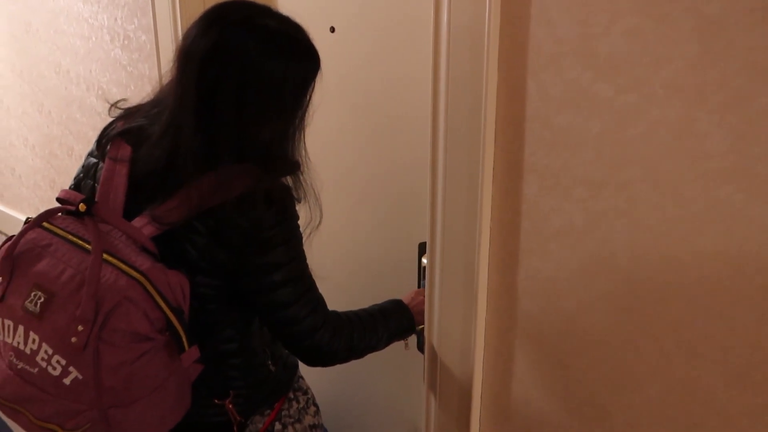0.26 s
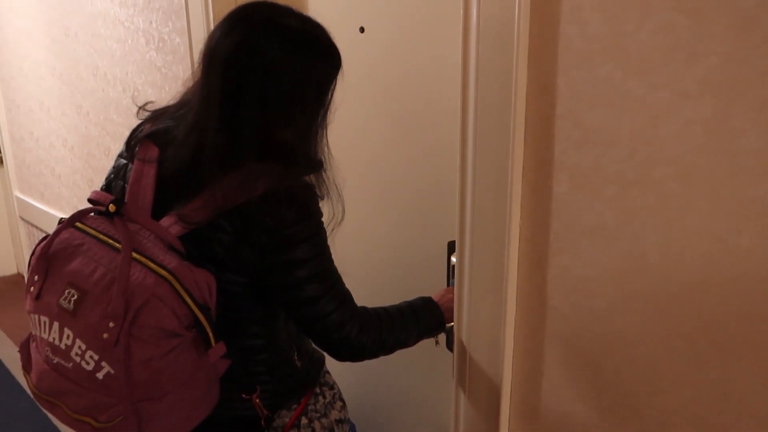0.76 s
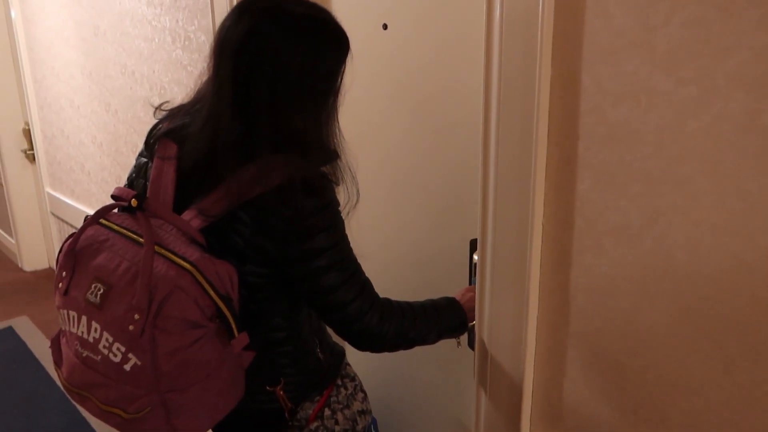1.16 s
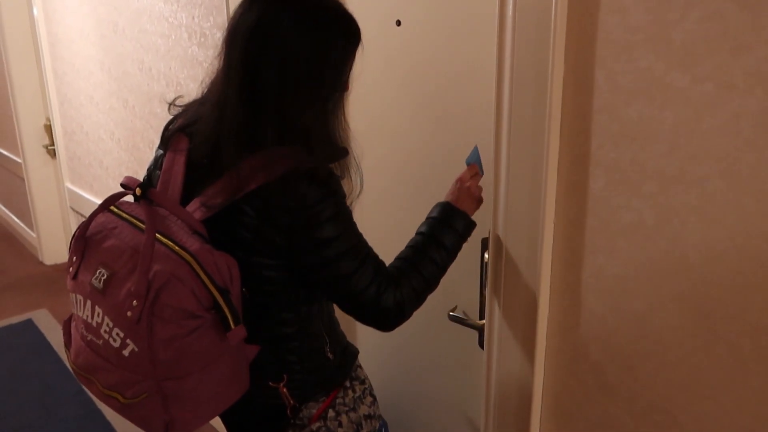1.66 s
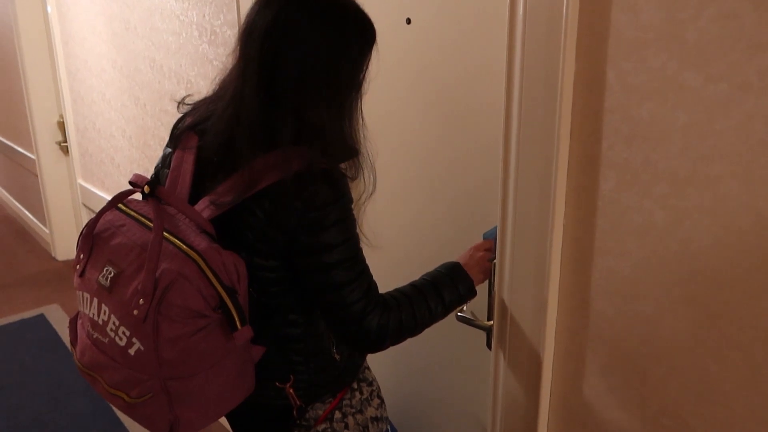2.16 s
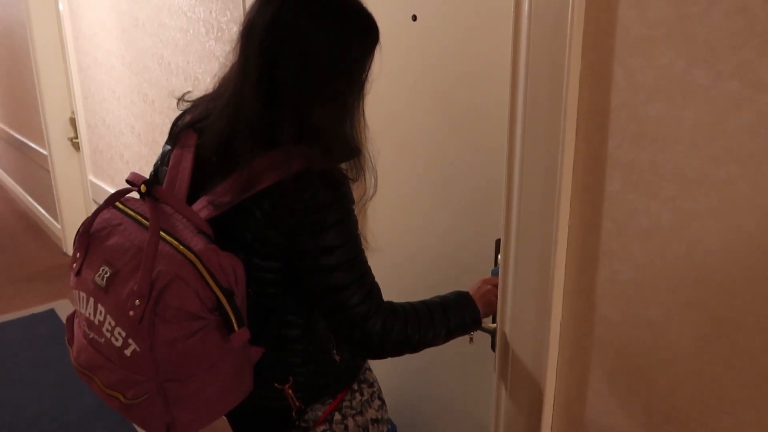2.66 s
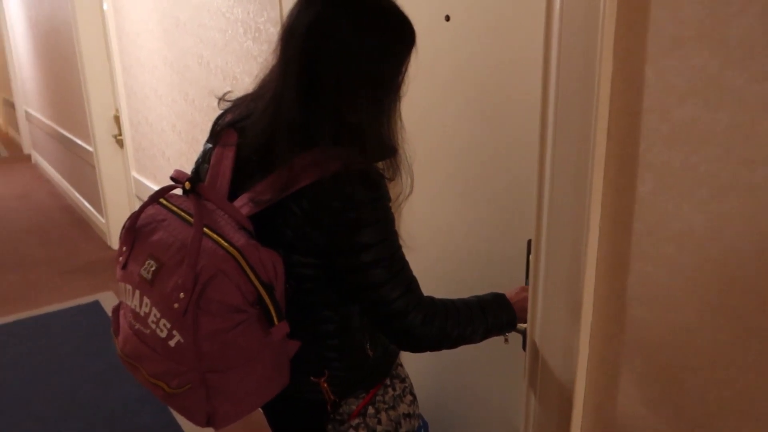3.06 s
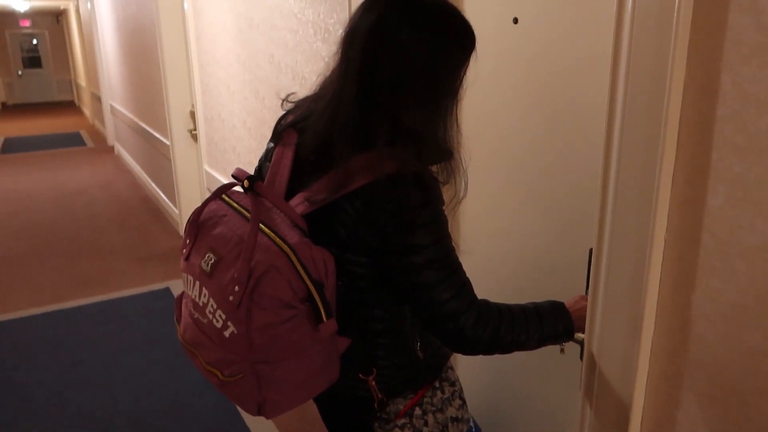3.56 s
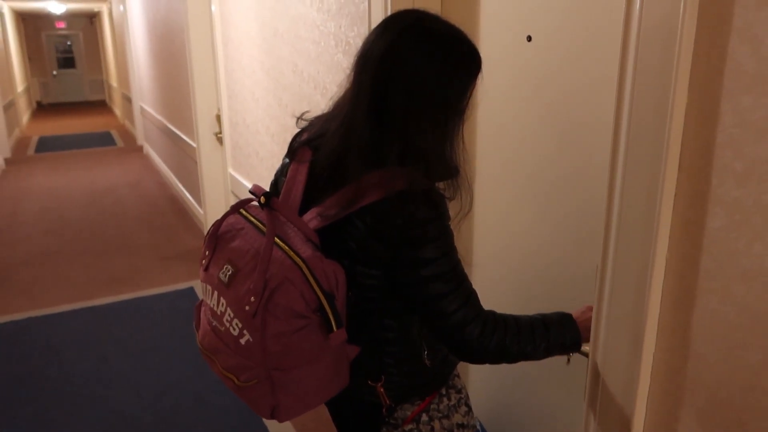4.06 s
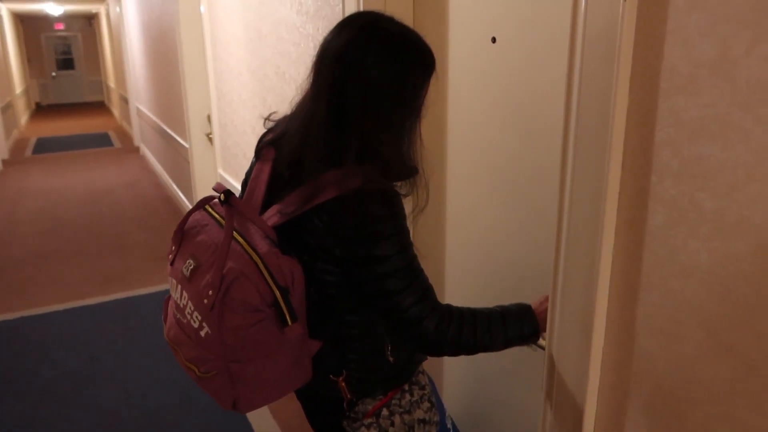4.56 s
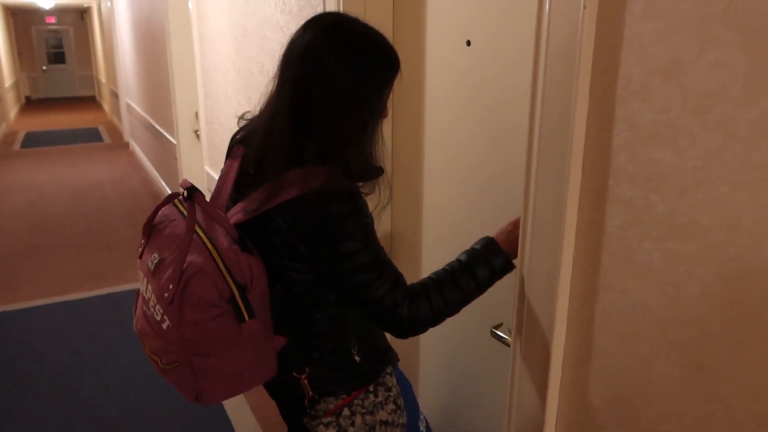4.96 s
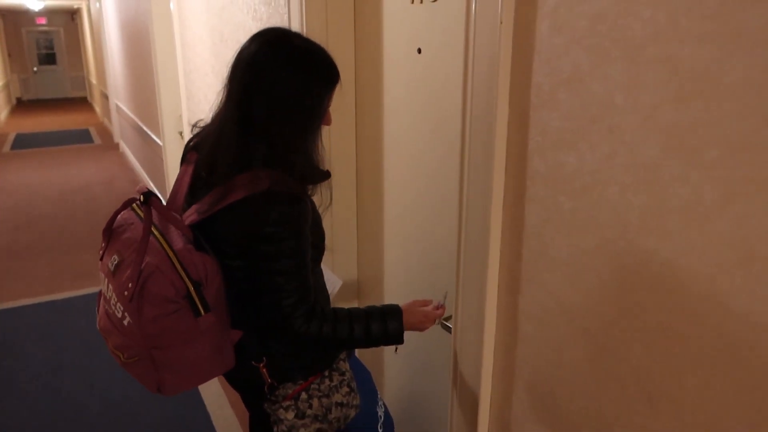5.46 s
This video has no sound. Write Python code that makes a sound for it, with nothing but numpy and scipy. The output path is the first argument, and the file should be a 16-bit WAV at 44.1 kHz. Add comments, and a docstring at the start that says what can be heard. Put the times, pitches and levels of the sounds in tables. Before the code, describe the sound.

Someone works a stubborn door handle in a hallway. Light metallic ticks lead to a single heavy clunk at about one and a half seconds, then a lull, small knocks and repeated latch snaps with loose rattling and low door thuds. Short diffuse echo, soft air hiss, microphone rumble and a very faint whine.

```python
"""Over steady corridor air, rumble and a faint recorder whine, a sleeve rubs and a lever is tried from the start.
Someone works the lock of a wooden door that stays shut in a long carpeted corridor: the lever springs back once
with a loud clunk that shakes the leaf, then the latch clicks and rattles again and again.
Metal contacts are noise flurries through body colours, leaf and small rings are dying sines, and rubs and air
are coloured noise; lock, door and rubs also go through the corridor's diffuse echo."""
import sys
import numpy as np
from scipy import signal
from scipy.fft import rfft, irfft
from scipy.io import wavfile
from scipy.ndimage import uniform_filter1d

SR = 44100
rng = np.random.default_rng(int(sys.argv[2]) if len(sys.argv) > 2 else 0)


def store_pcm(level_fs):
    """Save levels as 16-bit WAV."""
    pcm = np.round(np.clip(level_fs, -1, 1) * 32767).astype(np.int16)
    wavfile.write(sys.argv[1], SR, np.atleast_2d(pcm).T)


N = 251634  # samples
TIME = np.arange(N) / SR  # s
HIT_SIZE = 8192  # samples in one contact sound
HIT_TIME = TIME[:HIT_SIZE]
HIT_HZ = np.fft.rfftfreq(HIT_SIZE, 1 / SR)

# Corridor air. Each row: frequency in Hz, relative level in dB.
AIR_COLOUR = [(35, -47), (60, 1.5), (274, -6), (408, -7), (527, -5.5), (682, -12), (1470, -16), (1780, -17),
              (3270, -23), (3940, -20.5), (4220, -22), (8120, -24.5), (16000, -26)]
AIR_DB = -52  # rms
# Rumble on the microphone. Each row: frequency in Hz, relative level in dB.
RUMBLE_COLOUR = [(5, -1), (14, -1.5), (25, -7), (45, -10.5), (90, -27.5), (200, -35.5), (600, -59.5)]
# The microphone rumbles more once it is carried along.
STILL_DB, MOVING_DB, MOVE_START_S, MOVE_RAMP_S = -52, -42, 1.0, 2.0186
# Steady whine of the hand-held recorder. Each row: frequency in Hz, rms level in dB.
WHINE_TONES = [(3000, -75), (4000, -68.5), (5000, -74), (7000, -77.5), (8000, -73.5), (9000, -79),
               (10000, -89.5), (12000, -79.5)]

# Decay of the corridor. Each row: frequency in Hz, time to fall by 60 dB in seconds.
ECHO_T60 = [(70, 1.3542), (300, 0.9511), (1400, 0.6483), (3000, 1.0268), (8000, 0.7894), (15000, 0.0069)]
# Strength of its echoes. Each row: frequency in Hz, level in dB.
ECHO_LEVEL = [(70, -11.5), (300, -0.5), (1400, -7.5), (3000, -10.5), (8000, -12), (15000, -13.5)]

# Sleeve and fingers rubbing. Each row: centre in seconds, half length (to 1/e) in seconds, level in dB,
# tilt in dB per octave above 2 kHz.
SLEEVE_RUBS = [(0.04, 0.2646, -51, -11.5), (0.417, 0.05792, -52.5, -1), (0.965, 0.018, -42.5, -2),
               (2.099, 0.2516, -53, -16), (3.8, 0.1405, -52.5, -7.5), (5.252, 0.03246, -48.5, -8),
               (5.62, 0.3269, -51.5, -10.5)]
# Colour of the friction. Each row: frequency in Hz, relative level in dB.
FRICTION_COLOUR = [(300, -13.5), (1200, -7), (2500, -7), (4500, -3), (6500, -4.5), (8000, 1.5), (10500, -8),
                   (16000, -13)]
# The bolt rubs before each snap: level relative to the steel click, tilt per octave above 2 kHz.
SLIDE_LEAD_S, SLIDE_HALF_S, SLIDE_DB, SLIDE_TILT_DB = 0.036, 0.038, -24.5, -6.5

# Blows on the door leaf: the loud clunk and softer low thuds. Each row: start in seconds, level in dB,
# contact cut-off in Hz.
LEAF_BLOWS = [(1.068, -23.5, 288.5), (1.480, -1, 6000), (1.492, -35.5, 450), (1.778, -27, 451),
              (2.967, -17, 716.2), (4.838, -10.5, 344.8), (4.946, -10, 422.5)]
# Leaf with its handle plate. Each row: frequency in Hz, level in dB, time to fall by 60 dB in seconds.
LEAF_MODES = [(129.8, -21, 0.18886), (158.31, -30.5, 0.2264), (221.23, -23.5, 0.23105),
              (293.08, -19.5, 0.13593), (370.39, -21.5, 0.14), (441.64, -26, 0.17), (593.15, -19, 0.21),
              (740.49, -14.5, 0.07383), (820.68, -23.5, 0.21), (934.95, -29.5, 0.0892),
              (1048.4, -32, 0.083), (1415.6, 8, 0.02043), (1600, -5.5, .02), (2287, -21, 0.15),
              (3163.3, -20, 0.066)]
# Lowest bending modes. Each row: frequency in Hz, level in dB, time to fall by 60 dB in seconds.
BENDING_MODES = [(52.41, -7.5, 1), (77.14, -0.5, 0.6244), (93.126, -9, 0.4237), (115.88, -12.5, 0.6165)]
# Leaf shuddering in its frame. Each row: frequency in Hz, relative level in dB.
SHUDDER_COLOUR = [(30, -2), (70, 6), (110, -1.5), (180, 5), (300, -2), (450, -0.5), (900, -13.5),
                  (3000, -30)]
BOOM_DB, BOOM_GROWTH = -19, 1.2926  # boom for a 0 dB blow; dB of boom per dB of blow
SEAT_CUT_HZ = 700  # contact cut-off of the seating latch on the leaf

# Small rings: metal parts ringing on contacts, and a faint squeak in the swish near 0.96 s.
# Each row: start in seconds, central frequency in Hz, level in dB, time to fall by 60 dB in seconds.
SMALL_RINGS = [(0.106, 2736, -26, 0.02589), (.963, 4900, -46.5, 0.1755), (1.452, 7930, -17.5, 0.02938),
               (1.460, 1001, -13, 0.044), (2.934, 3450, -42, 0.06185), (2.968, 5947, -32.5, 0.04844),
               (2.967, 780, -28, 0.0346), (3.708, 3230, -48, 0.06134), (4.466, 5832, -30, 0.1157),
               (4.909, 1314, -21.5, 0.0907), (4.911, 7872, -20.5, 0.06906), (4.967, 1551, -30.5, 0.0885)]

# Broad colour of the lock case. Each row: frequency in Hz, relative level in dB.
CASE_COLOUR = [(100, -38.5), (300, -13.5), (600, -17), (850, -8.5), (980, 1.5), (1400, -2), (1700, -2),
               (2100, -11), (3000, -15.5), (4500, -29.5), (12000, -33)]
# Broad colour of the steel parts. Each row: frequency in Hz, relative level in dB.
STEEL_COLOUR = [(300, -10.5), (900, 5), (1500, -2), (2300, 1.5), (4000, 1), (6000, 2), (7000, 1.5),
                (8400, 4), (10200, -6.5), (12500, -8), (16000, -15)]
# Resonances of the case, with dips below zero. Each row: frequency in Hz, width in Hz, lift in dB.
CASE_RESONANCES = [(565.49, 16.67, 11.5), (844.46, 27, -12), (992.93, 16.667, 0.5), (1036.2, 110, -2.5),
                   (1186, 54, 2.5), (1301, 58, 5.5), (1361.1, 38, 5), (1560, 36, 4.5)]
# Resonances of the steel. Each row: frequency in Hz, width in Hz, lift in dB.
STEEL_RESONANCES = [(3119.8, 209, 4), (5164.1, 130, 2.1), (5478, 53.25, 1.76), (7664, 160, 1.7973),
                    (8989.7, 213.4, 2.6)]

# Loose pins and springs tick. Each row: start in seconds, steel level in dB, steel tilt in dB per octave
# above 2 kHz.
LOOSE_TICKS = [(0.088, -38.5, -2), (0.233, -47, -0.5), (1.544, -31, -2), (1.633, -35.5, -1),
               (2.022, -43, -1), (2.910, -37, -4.5), (2.937, -39.5, -3.5), (2.967, -33.5, -1),
               (4.165, -28.5, -2), (4.4642, -26.5, -1), (4.489, -34.5, -1.5), (4.603, -38, -1),
               (4.889, -39.5, 5), (4.940, -31, -1.5), (5.001, -35, -0.5), (5.046, -34, -3),
               (5.616, -40, -1.5)]
TICK_CASE_DB, TICK_CASE_TILT_DB = -7, -5.5  # case answer: relative to the steel, tilt per octave
# The lever knocks against its stops. Each row: start in seconds, case level in dB,
# case tilt in dB per octave from 400 to 4000 Hz, steel level in dB.
LEVER_KNOCKS = [(0.0718, -39, -1, -46), (0.1044, -31, 3.5, -35), (.207, -40, -2.5, -43.5),
                (.374, -47, -3.5, -58.5), (.472, -46.5, -4, -57), (1.364, -39, 9, -49),
                (1.427, -29, 1.5, -30.5), (1.4777, -16, 0.5, -12.5), (1.592, -27.5, -6, -59.5),
                (2.579, -39, 0.5, -44.5), (2.704, -49, 8, -47), (2.997, -29, -1, -36.5),
                (3.092, -40, -7.5, -50), (3.705, -42.5, -4, -41.5), (4.015, -36.5, 2.5, -35),
                (4.151, -32, 6, -31), (4.356, -37, 0, -35), (4.530, -31.5, -4, -39.5),
                (4.655, -36, -7.5, -42), (4.8759, -33, 0.5, -29.5)]
KNOCK_TILT_DB, BRIGHTER_PER_DB = -0.5, 0.2273  # steel tilt per octave at 0 dB; its growth per dB
# The latch snaps free and seats. Each row: start in seconds, steel click level in dB, case level in dB,
# time until it seats in seconds, leaf level in dB, steel tilt of the click in dB per octave above 2 kHz.
LATCH_SNAPS = [(1.452, -20, -15.5, 0.007175, -16, 4), (3.1723, -32.5, -26, .008, -20.5, 4.5),
               (4.103, -23, -18, 0.0051242, -18.5, 3.5), (4.418, -21, -16.5, 0.0040433, -17, 3),
               (4.7165, -25, -21.5, .0055, -16.5, 0), (4.910, -22.5, -25, .004, -18, 5.5)]
# The bolt catches the edge just before it snaps; levels relative to the snap.
CATCH_LEAD_S, CATCH_CASE_DB, CATCH_STEEL_DB = 0.0046, -16, -19.5
# The loose lever settles after each snap: level relative to the case, random spread as standard deviation.
RATTLE_AFTER_S, RATTLE_SPAN_S = 0.03, 0.2
RATTLE_DB, RATTLE_FALL_DB_PER_S, RATTLE_SPREAD_DB = -15, 72, 4.5
CUTOFF_HZ = 15750  # upper limit of the sound


def from_db(db):
    """Decibels to gain."""
    return 10 ** (np.asarray(db) / 20)


def rms_one(x):
    """Scale to unit rms."""
    return x / np.sqrt(np.mean(x ** 2) + 1e-20)


def at_hz(points, hz):
    """Read a table on a log-frequency axis."""
    points = np.array(points)
    return np.interp(np.log(hz + 1e-9), np.log(points[:, 0]), points[:, 1])


def add(track, s, sound):
    """Mix a sound into the track from time s on."""
    start = max(round(s * SR), 0)
    track[start:start + len(sound)] += sound[:N - start]


def colour_db(spectrum, peaks=(), tilt_db=0):
    """Response of a body: broad colour, resonances on top, and a tilt per octave above 2 kHz."""
    lifts = sum(db / (1 + (2 * (HIT_HZ - hz) / width) ** 2) for hz, width, db in peaks)
    return at_hz(spectrum, HIT_HZ) + lifts + tilt_db * np.log2(np.hypot(1, HIT_HZ / 2000))


def through(x, response_db):
    """Causal (minimum-phase) filter with the given response."""
    cepstrum = irfft(np.log(from_db(response_db)))
    # fold the acausal half forward
    cepstrum[1:HIT_SIZE // 2] *= 2
    cepstrum[HIT_SIZE // 2 + 1:] = 0
    impulse_response = irfft(np.exp(rfft(cepstrum)))
    return signal.fftconvolve(x, impulse_response)[:len(x)]


def noise(spectrum):
    """Steady coloured noise of unit rms."""
    white = rfft(rng.standard_normal(N))
    colour = from_db(at_hz(spectrum, np.fft.rfftfreq(N, 1 / SR)))
    return rms_one(irfft(white * colour, N))


def chatter(response_db, rise, t60, grain_db, size=61):
    """A dying flurry of uneven micro-impacts rings a body; its energy is that of 10 ms at unit rms."""
    impacts = rng.standard_normal(HIT_SIZE) * from_db(grain_db * rng.standard_normal(HIT_SIZE))
    flurry = impacts * (1 - np.exp(-HIT_TIME / rise)) * from_db(-60 * HIT_TIME / t60)
    # take out the flurry's own smoothed colour, so that the body sets it
    own_db = 10 * np.log10(uniform_filter1d(np.abs(rfft(flurry)) ** 2, size) + 1e-12)
    return rms_one(through(flurry, response_db - own_db)) * np.sqrt(SR / 100 / HIT_SIZE)


def background():
    """Corridor air and microphone rumble are coloured noise; the whine is a set of steady sines."""
    moving = np.clip((TIME - MOVE_START_S) / MOVE_RAMP_S, 0, 1)
    rumble = from_db(STILL_DB + (MOVING_DB - STILL_DB) * moving) * noise(RUMBLE_COLOUR)
    whine = np.zeros(N)
    for hz, db in WHINE_TONES:
        whine += np.sqrt(2) * from_db(db) * np.sin(2 * np.pi * (hz * TIME + rng.random()))
    return from_db(AIR_DB) * noise(AIR_COLOUR) + rumble + whine


def corridor(x, build=0.003857, size=45):
    """Diffuse echoes build up between the walls, favour no pitch, and die at a rate set by frequency."""
    t = TIME[:SR * 3 // 2]
    white, hz = rfft(rng.standard_normal(len(t))), np.fft.rfftfreq(len(t), 1 / SR)
    centres = np.geomspace(60, 15000, 12)  # overlapping bands, Hz
    echoes = np.zeros(len(t))
    for centre, share in zip(centres, np.eye(len(centres))):
        band = irfft(white * at_hz(np.c_[centres, share], hz), len(t))
        echoes += band * from_db(-60 * t / at_hz(ECHO_T60, centre))
    response = rfft(echoes, 2 * len(t))
    # level the smoothed spectrum before giving it the echo strength
    response = response / np.sqrt(uniform_filter1d(np.abs(response) ** 2, 2 * size) + 1e-12)
    response = response * from_db(at_hz(ECHO_LEVEL, np.fft.rfftfreq(2 * len(t), 1 / SR)))
    impulse_response = irfft(response)[:len(t)] * (1 - np.exp(-(t / build) ** 2))
    return signal.fftconvolve(x, impulse_response)[:N]


def rubbing(grain_db=6.0):
    """Short swells of fine friction grains: sleeve, fingers, and the bolt sliding before each snap."""
    out = np.zeros(N)
    slides = [(s - SLIDE_LEAD_S, SLIDE_HALF_S, steel_db + SLIDE_DB, SLIDE_TILT_DB)
              for s, steel_db, *_ in LATCH_SNAPS]
    for s, half, db, tilt_db in list(SLEEVE_RUBS) + slides:
        grains, sizes = rng.standard_normal((2, SR))
        uneven = grains * from_db(grain_db * sizes)
        hiss = rms_one(through(uneven, colour_db(FRICTION_COLOUR, tilt_db=tilt_db)))
        start = max(s - 0.5, 0)
        swell = np.exp(-((start + TIME[:SR] - s) / half) ** 2)
        add(out, start, from_db(db) * hiss * swell)
    return out


def struck(modes, t, cycles=2.865):
    """Dying sines of alternating sign; waves take a few cycles to fill the leaf, so the lows come last."""
    out = np.zeros(len(t))
    for k, (hz, db, t60) in enumerate(modes):
        filling = 1 - np.exp(-(t * hz / cycles) ** 2)
        out += (-1) ** k * from_db(db - 60 * t / t60) * filling * np.sin(2 * np.pi * hz * t)
    return out


def door(shudder_db=-22):
    """Each blow and latch seating rings and shakes the leaf; soft contact dulls all but its low boom."""
    out, t = np.zeros(N), TIME[:SR]
    ring, boom = struck(LEAF_MODES, t), struck(BENDING_MODES, t)
    seatings = [(s + travel, leaf_db, SEAT_CUT_HZ) for s, _, _, travel, leaf_db, _ in LATCH_SNAPS]
    for s, db, cut_hz in list(LEAF_BLOWS) + seatings:
        shudder = chatter(colour_db(SHUDDER_COLOUR), rise=0.007255, t60=0.2143, grain_db=-6.0)
        blow = ring.copy()
        add(blow, 0, from_db(shudder_db) * shudder)
        softness = signal.butter(2, min(cut_hz, SR / 3), fs=SR, output="sos")
        blow = signal.sosfilt(softness, blow)
        add(out, s, from_db(db) * blow + from_db(BOOM_DB + BOOM_GROWTH * db) * boom)
    return out


def small_rings(split=0.02377, count=5):
    """Each ring or squeak is a cluster of close modes that beat as they die away."""
    out, steps = np.zeros(N), np.arange(count) - count // 2
    for s, hz, db, t60 in SMALL_RINGS:
        modes = hz * (1 + split * (steps + rng.normal(0, 0.11373, count)))
        phases = np.outer(modes, HIT_TIME) + rng.random((count, 1))
        ring = from_db(-3 * abs(steps)) @ np.sin(2 * np.pi * phases)
        fade = from_db(-60 * HIT_TIME / t60)
        # the cluster carries the same energy however its modes add up
        even = np.linalg.norm(fade) / np.linalg.norm(ring * fade)
        add(out, s, from_db(db) * ring * fade * even)
    return out


def contact(case_db, case_tilt_db, steel_db, tilt_db, case_t60=0.11757, steel_t60=0.1171,
            softening=0.3554, top_loss_db=2.1706):
    """Steel clicks, at once if bright and slower if dull; the lock case, set in the wood, swells and rings."""
    # a dull contact closes more slowly and hardly reaches the highest steel modes
    rise = 0.000064 * np.exp(-softening * tilt_db)
    dull_db = top_loss_db * min(tilt_db, 0) * (HIT_HZ / 10000) ** 2
    steel = colour_db(STEEL_COLOUR, STEEL_RESONANCES, tilt_db) + dull_db
    click = chatter(steel, rise=rise, t60=steel_t60, grain_db=4.5)
    octaves = np.log2(np.clip(HIT_HZ, 400, 4000))
    case = colour_db(CASE_COLOUR, CASE_RESONANCES) + case_tilt_db * octaves
    body = chatter(case, rise=0.001044, t60=case_t60, grain_db=4.0)
    return from_db(steel_db) * click + from_db(case_db) * body


def ticks():
    """Loose pins and springs tick in the steel; the case answers weakly and dully."""
    out = np.zeros(N)
    for s, db, tilt_db in LOOSE_TICKS:
        add(out, s, contact(db + TICK_CASE_DB, TICK_CASE_TILT_DB, db, tilt_db))
    return out


def lever_knocks():
    """The lever hits its stops and sounds case and steel; harder steel contacts are brighter."""
    out = np.zeros(N)
    for s, case_db, case_tilt_db, steel_db in LEVER_KNOCKS:
        steel_tilt_db = KNOCK_TILT_DB + BRIGHTER_PER_DB * steel_db
        add(out, s, contact(case_db, case_tilt_db, steel_db, steel_tilt_db))
    return out


def settling(count=4, steel_share_db=-8):
    """After each snap the lever chatters in its play, unevenly and on the whole ever more lightly."""
    out = np.zeros(N)
    for s, _, case_db, *_ in LATCH_SNAPS:
        for after in RATTLE_AFTER_S + RATTLE_SPAN_S * (np.arange(count) + rng.random(count)) / count:
            spread_db = RATTLE_SPREAD_DB * rng.standard_normal()
            db = case_db + RATTLE_DB - RATTLE_FALL_DB_PER_S * after + spread_db
            add(out, s + after, contact(db, case_tilt_db=0.0, steel_db=db + steel_share_db, tilt_db=1))
    return out


def latch(release_case_db=-6, seat_steel_db=-3.0, seat_duller_db=6):
    """A light catch, a bright click as the bolt comes free, then a duller, heavier hit as it seats."""
    out = np.zeros(N)
    for s, steel_db, case_db, travel, _, tilt_db in LATCH_SNAPS:
        catch = contact(case_db + CATCH_CASE_DB, case_tilt_db=-7,
                        steel_db=steel_db + CATCH_STEEL_DB, tilt_db=-5)
        release = contact(case_db + release_case_db, case_tilt_db=3,
                          steel_db=steel_db, tilt_db=tilt_db, steel_t60=0.09669)
        seat = contact(case_db, case_tilt_db=1, steel_db=steel_db + seat_steel_db,
                       tilt_db=tilt_db - seat_duller_db, case_t60=0.09217, steel_t60=0.07197)
        add(out, s - CATCH_LEAD_S, catch)
        add(out, s, release)
        add(out, s + travel, seat)
    return out


def scene(door_echo_db=-5, ring_echo_db=-4):
    """All but the background sounds into the corridor; the near leaf and small rings are more direct."""
    leaf, rings = door(), small_rings()
    rattle = rubbing() + ticks() + lever_knocks() + settling() + latch()
    radiated = rattle + from_db(door_echo_db) * leaf + from_db(ring_echo_db) * rings
    return (background() + corridor(radiated) + leaf + rings + rattle)[None]


def record(dry):
    """Peaks are clipped a little under full scale, then the top is cut steeply."""
    clipped = np.clip(dry, -0.85, 0.85)
    top_cut = signal.ellip(10, 0.1, 80, CUTOFF_HZ, fs=SR, output="sos")
    return signal.sosfilt(top_cut, clipped)


dry = scene()
out = record(dry)
store_pcm(out)
```